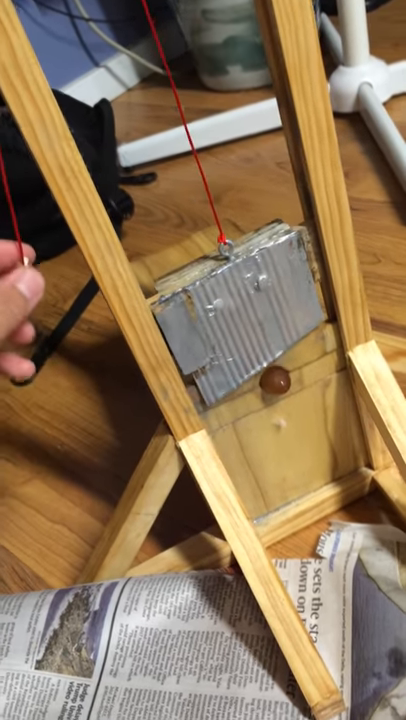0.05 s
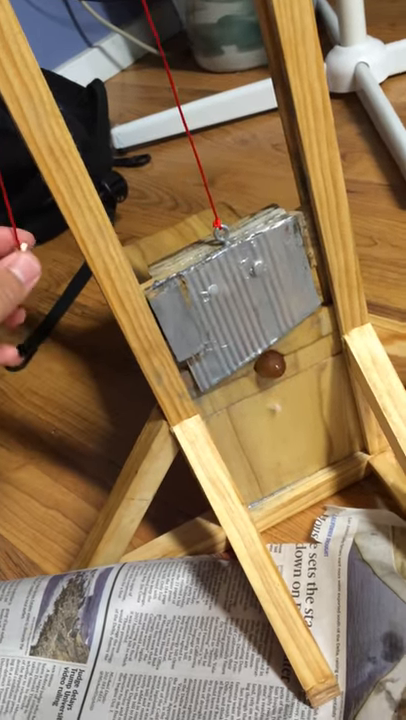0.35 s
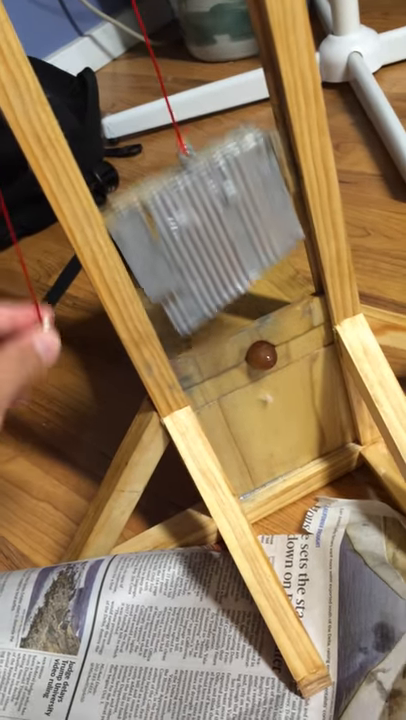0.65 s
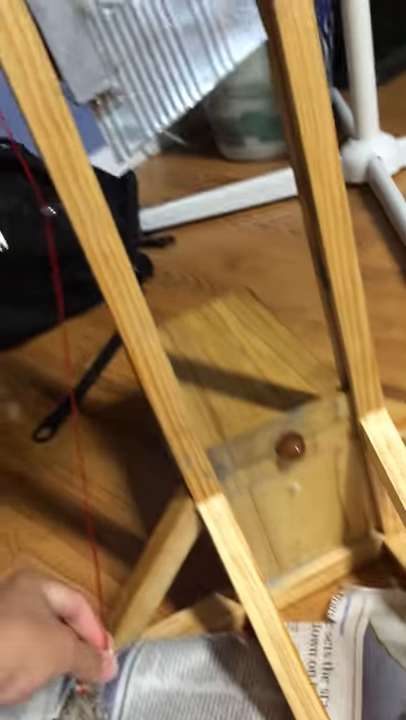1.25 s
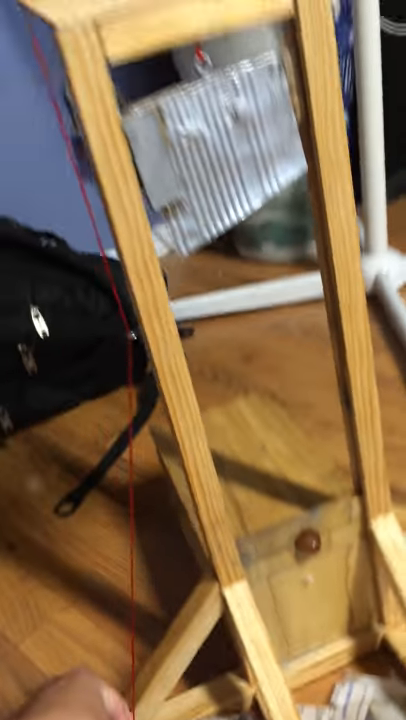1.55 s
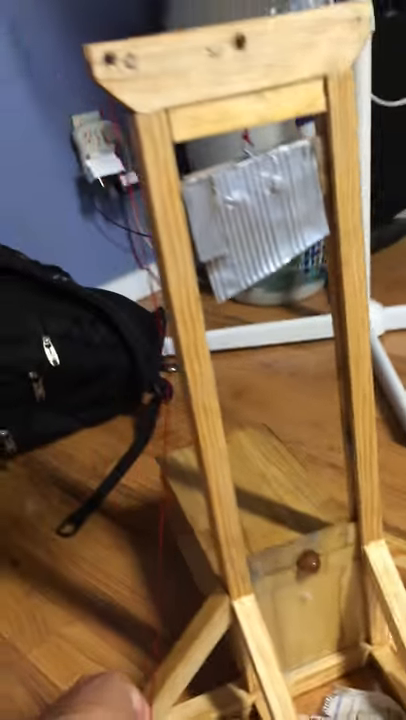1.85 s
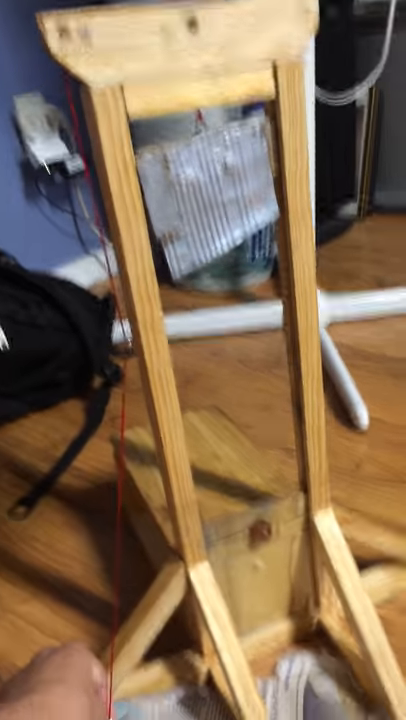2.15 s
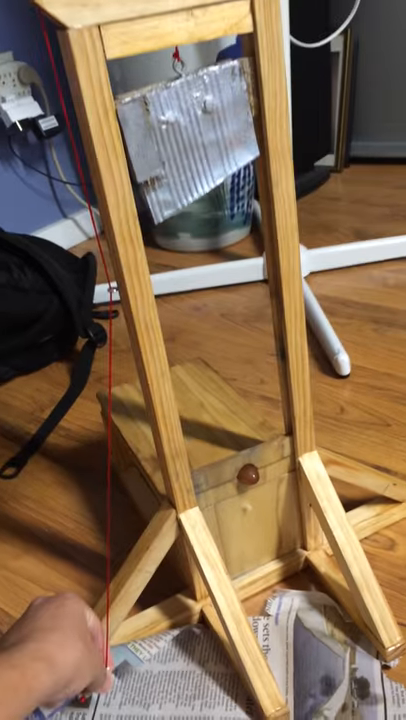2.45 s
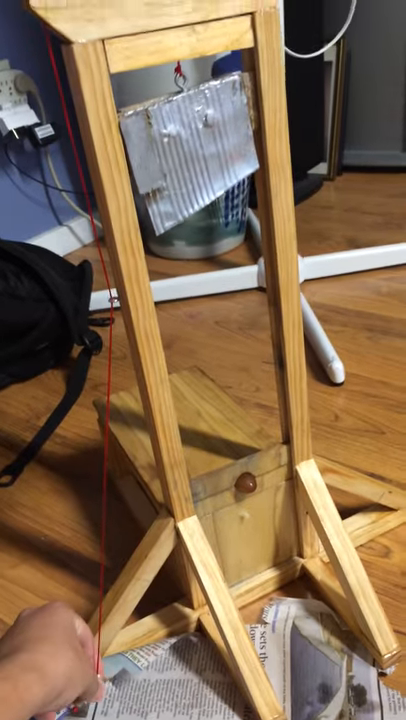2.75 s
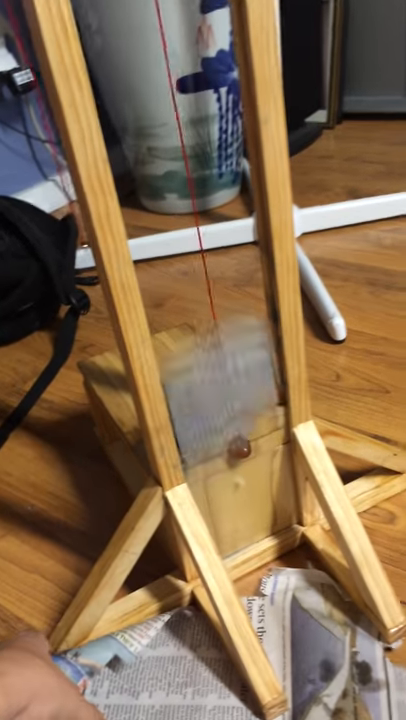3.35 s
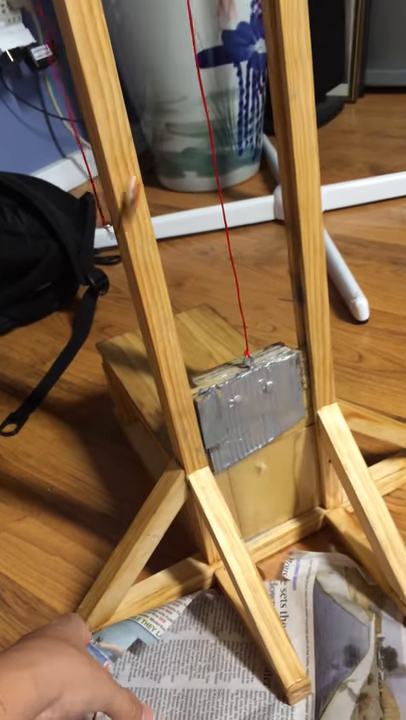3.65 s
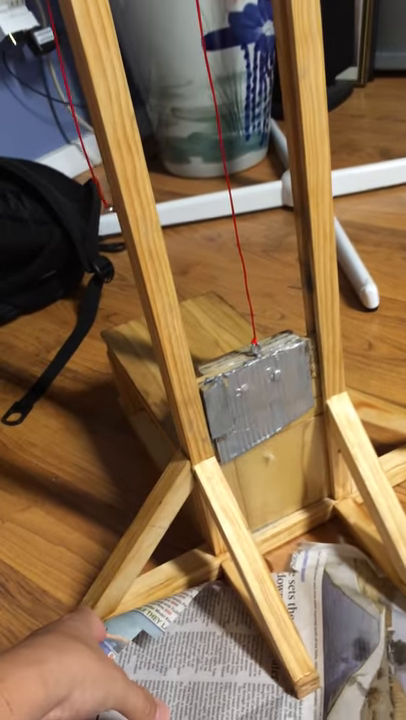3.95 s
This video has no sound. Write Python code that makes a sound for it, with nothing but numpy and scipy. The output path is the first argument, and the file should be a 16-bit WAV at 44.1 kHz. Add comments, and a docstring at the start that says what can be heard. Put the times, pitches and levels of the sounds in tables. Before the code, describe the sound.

A model guillotine's blade is hauled up, rasping, then slams onto its wooden base.

```python
"""Small wooden guillotine, close up

A quiet, small room, the microphone near the frame. A cord hauls the foil-clad blade up its grooves:
it judders free, chatters against the posts and ticks at the top. Let go, it scrapes down, slams
into the wooden base, bounces and settles with a few metallic clinks. Handling rumbles underneath."""
import sys
import numpy as np
from scipy import signal
from scipy.fft import rfft, irfft, next_fast_len
from scipy.io import wavfile
from scipy.ndimage import uniform_filter1d

SR = 44100
rng = np.random.default_rng(int(sys.argv[2]) if len(sys.argv) > 2 else 0)


def master_out(mix):
    """Clip the mix to full scale and print it as 16-bit PCM to the path in sys.argv[1]."""
    frames = np.transpose(np.atleast_2d(mix))
    ceiling = np.clip(frames, -1, 1)
    pcm = np.round(ceiling * 32767).astype(np.int16)
    wavfile.write(sys.argv[1], SR, pcm)


N = 176400
T = np.arange(N) / SR
RING_T = T[:SR * 3 // 4]  # time axis of one impact
CONTACT_RISE_S = .00047

# Spectrum of the blade on the posts, rubbing or bumping. Each row: frequency in Hz, level in dB.
POST_COLOUR = [(100, -12), (300, -2), (500, 0.5), (720, 0.5), (1000, -7), (1350, -5), (1900, -18.5),
               (3000, -31), (12000, -47)]


def undb(db):
    """Decibels to gain."""
    return 10 ** (np.asarray(db) / 20)


def unit(x):
    """Scale to rms 1."""
    return x / np.sqrt(np.mean(x ** 2) + 1e-30)


def curve(rows):
    """Gain along (seconds, dB) points, silent outside them."""
    s, db = np.array(rows).T
    return undb(np.interp(T, s, db, left=-200, right=-200))


def swell(start, length):
    """A half-sine rise and fall, timed in seconds."""
    return np.sin(np.pi * np.clip((T - start) / length, 0, 1))


def rise(s):
    """A contact builds up with a time constant of s seconds."""
    return 1 - np.exp(-RING_T / s)


def fade(t60):
    """Decay by 60 dB in t60 seconds."""
    return np.exp(-np.log(1000) * RING_T / t60)


def wander(hz):
    """Smooth random motion up to about hz, rms 1."""
    return unit(signal.sosfilt(signal.butter(2, hz, fs=SR, output="sos"), rng.standard_normal(N)))


def colour(x, points, tilt_db=0):
    """Filter through (Hz, dB) points, tilted per octave above 1 kHz; white noise keeps its power."""
    size = 2 * next_fast_len(len(x) // 2 + 2048)
    octave = np.log2(np.maximum(np.arange(size // 2 + 1) * SR / size, 10))
    hz, db = np.array(points).T
    gain = unit(undb(np.interp(octave, np.log2(hz), db) + tilt_db * np.maximum(octave, 10)))
    cepstrum = irfft(np.log(gain))
    cepstrum[1:size // 2] *= 2  # minimum phase: nothing sounds ahead of a hit
    cepstrum[size // 2 + 1:] = 0
    return irfft(rfft(x, size) * np.exp(rfft(cepstrum)))[:len(x)]


def ring(modes):
    """Decaying (Hz, dB, t60) modes of a struck object, alternating in sign."""
    return sum((-1) ** k * undb(db) * fade(t60) * np.sin(2 * np.pi * hz * RING_T)
               for k, (hz, db, t60) in enumerate(modes))


def through(x, response):
    """Pass a sound through a ringing body or room."""
    return signal.fftconvolve(x, response)[:N]


def add(out, start, x):
    """Mix a sound in at start seconds."""
    i = int(start * SR)
    out[i:i + len(x)] += x[:N - i]


def burst(t60):
    """A rough contact that dies away, even in spectrum."""
    envelope = fade(t60)[:int(SR * np.clip(1.3 * t60, .01, .75))]
    x = rng.choice([-1., 1.], len(envelope)) * envelope
    for _ in range(3):  # flatten the spectrum, then restore the decay
        x = irfft(np.exp(1j * np.angle(rfft(x))), len(x))
        local_power = np.abs(uniform_filter1d(x * x, len(x) // 24))
        x = x * envelope / np.sqrt(local_power + 1e-20)
    return np.pad(x, (0, len(RING_T) - len(x)))


def grains(per_s, spread_db):
    """Dense tiny catches of one surface on another."""
    catches = (rng.random(N) < per_s / SR) * rng.choice([-1., 1.], N)
    return unit(catches * undb(spread_db * np.minimum(rng.exponential(size=N), 4)))


def room_tone():
    """Still air: faint, steady noise, mostly bass."""
    # Each row: frequency in Hz, level in dB.
    spectrum = [(15, -58), (25, -32.5), (60, -9), (163, -3), (196, -20.5), (271, -14.5), (344, -24),
                (462, -27.5), (709, -19), (1030, -22), (1420, -25), (1810, -26.5), (15000, -46)]
    return undb(-65) * unit(colour(rng.standard_normal(N), spectrum))


def handling_rumble():
    """Handling makes a soft rumble that comes and goes."""
    # Each row: time in seconds, level in dB.
    levels = [(0, -55.5), (.1, -60.5), (.25, -67), (1.2, -66), (1.53, -53.5), (1.7, -57), (1.83, -61.5),
              (2.0, -61.5), (2.15, -63), (2.4, -64), (2.76, -65), (3.1, -64), (3.55, -60), (3.8, -66),
              (4, -60)]
    # Each row: frequency in Hz, level in dB.
    spectrum = [(25, -12.5), (75, -2.5), (170, 5), (300, -4), (600, -10), (2000, -20), (6000, -27.5),
                (15000, -42)]
    return colour(rng.standard_normal(N), spectrum) * curve(levels)


def brushes():
    """Cord and blade brush the frame in soft, gritty strokes."""
    # Each row: start in seconds, length in seconds, level in dB.
    strokes = [(0, .11, -86), (0.18, .1, -74), (1.685, 0.055, -52.5), (2.227, 0.049, -69.5),
               (2.34, .05, -71.5), (3.827, 0.059, -60), (3.903, 0.087, -63.5)]
    # Each row: frequency in Hz, level in dB.
    spectrum = [(300, -16), (1200, -10), (2000, 3), (2800, -3.5), (4000, -10.5), (7000, -11.5),
                (15000, -31)]
    level = sum(undb(db) * swell(start, length) for start, length, db in strokes)
    return colour(grains(per_s=4000, spread_db=0), spectrum) * level


def judder():
    """The blade breaks free: uneven stick-slip pulses shake the frame, and each slip rasps on the wood."""
    # Course of the shake and the rasp. Each row: time in seconds, level in dB.
    shake_levels = [(.305, -69), (.325, -49), (.385, -52), (.405, -45.5), (.46, -46), (.55, -43.5),
                    (.61, -54.5), (.72, -56), (.8, -55), (.92, -52), (1.1, -62), (1.4, -65)]
    rasp_levels = [(.31, -73), (.335, -58), (.385, -58), (.41, -47), (.455, -47.5), (.478, -53.5),
                   (.525, -44.5), (.56, -47), (.6, -55), (.72, -71), (.8, -82.5)]
    # Their spectra. Each row: frequency in Hz, level in dB.
    shake_colour = [(30, -16), (70, 6.5), (120, -2.5), (200, 2.5), (290, -1), (400, -8.5), (700, -16),
                    (1500, -30), (8000, -80)]
    rasp_colour = [(200, -28), (500, -2), (1100, -3.5), (1600, 0.5), (2500, -2), (3300, -8), (4500, -15),
                   (15000, -39)]
    # Resonances of the rasped wood. Each row: frequency in Hz, level in dB, t60 in seconds.
    wood_modes = [(980, 3.5, 0.066), (1138, -1, .12), (1623, 2.5, 0.05), (1982.9, -5, 0.091)]
    slip_hz, scatter = 84.03, .22
    gaps = np.exp(scatter * rng.standard_normal(400)) / slip_hz
    phase = np.interp(T, np.cumsum(gaps), np.arange(len(gaps))) % 1
    slips = unit(1. * (np.diff(phase, prepend=0) < -.5))  # one pulse as each cycle ends
    shake = unit(colour(slips - slips.mean() + .55 * rng.standard_normal(N), shake_colour))
    grit = grains(per_s=5000, spread_db=1) * np.exp(-phase / 2.1)
    ringing = unit(through(grit, ring(wood_modes)))
    rasp = unit(unit(colour(grit, rasp_colour)) + undb(-4) * ringing)
    return shake * curve(shake_levels) + rasp * curve(rasp_levels)


def cord_hiss():
    """The running cord hisses with fine friction, its level flickering."""
    # Each row: time in seconds, level in dB.
    levels = [(.305, -87), (.33, -63.5), (.52, -62), (.63, -65.5), (.74, -56.5), (.95, -57.5), (1.2, -61),
              (1.32, -56.5), (1.45, -70.5), (1.48, -67), (1.51, -56.5), (1.55, -58.5), (1.65, -62),
              (1.68, -71), (1.715, -68), (1.78, -72), (1.83, -72), (1.91, -56), (2.0, -67.5), (2.07, -63.5),
              (2.15, -78), (2.45, -80.5), (2.55, -67), (2.72, -83), (3.2, -92)]
    # Each row: frequency in Hz, level in dB.
    spectrum = [(500, -12), (1300, -3), (2100, 1), (2900, -2.5), (4100, -2.5), (5200, -2), (6400, -2.5),
                (7500, -3), (8700, -6), (11000, -9.5), (15000, -18)]
    hiss = colour(grains(per_s=9000, spread_db=4), spectrum)
    return hiss * curve(levels) * undb(1.6 * wander(hz=16))


def groan():
    """The wood groans as the blade starts to move: a rough, sinking stick-slip tone."""
    # Each row: time in seconds, pitch in Hz, level in dB.
    glide = [(.385, 333, -52), (0.404, 324.7, -50), (.44, 313, -59), (0.46, 283.6, -39.5),
             (0.482, 285.3, -42.5), (.51, 245.7, -48), (.55, 233.3, -46.5), (.59, 222, -61),
             (0.621, 220, -63)]
    s, hz, db = np.array(glide).T
    pitch = np.interp(T, s, hz) * (1 + .0722 * wander(hz=89))
    tone = np.sin(2 * np.pi * np.cumsum(pitch) / SR)
    return unit(tone * (1 + .27 * wander(hz=60))) * curve(np.c_[s, db])


def squeaks():
    """Brief, wavering friction tones as the blade sticks."""
    # Each row: start in seconds, length in seconds, pitch in Hz, level in dB.
    sticks = [(0.396, 0.098, 1160, -51.5), (.5, 0.043, 990, -43.5), (.53, 0.059, 1160, -48.5),
              (0.498, 0.056, 2010, -50.5)]
    out, waver = np.zeros(N), 1 + .0271 * wander(hz=150)
    for start, length, hz, db in sticks:
        tone = np.sqrt(2) * np.sin(2 * np.pi * hz * np.cumsum(waver) / SR)
        out += undb(db) * swell(start, length) * tone
    return out


def hand_thumps():
    """The hand thumps softly, sounding one low, damped mode."""
    # Each row: start in seconds, level in dB.
    thumps = [(.455, -32), (0.777, -37), (.865, -39.5), (0.911, -35), (1.475, -54), (1.766, -43.5),
              (1.816, -43), (1.83, -43.5), (2.754, -44), (3.465, -38), (3.534, -35)]
    out, thump = np.zeros(N), ring([(83, 0, .06)]) * rise(.0056)
    for start, db in thumps:
        add(out, start, undb(db) * thump)
    return out


def cord_whistle():
    """The cord whistles over its guide: two narrow, patchy bands that sink as the pull slows."""
    # Each row: time in seconds, centre of the upper band in Hz, its level in dB.
    glide = [(.47, 5230, -67), (.53, 5260, -67), (0.601, 5593, -71), (0.679, 5550, -65), (.8, 5385, -63),
             (.97, 5220, -61), (1.1, 5030, -61), (1.251, 4980, -69.5), (1.4, 4960, -82)]
    width_hz, spacing_hz, flicker_db = 650, 1123, 2
    s, hz, db = np.array(glide).T
    centre = np.interp(T, s, hz)

    def band(band_hz):
        carrier = np.sin(2 * np.pi * np.cumsum(band_hz + 120 * wander(hz=197)) / SR)
        return unit(wander(width_hz / 2) * carrier * undb(flicker_db * wander(hz=25)))
    return (band(centre) + undb(-4.5) * band(centre - spacing_hz)) * curve(np.c_[s, db])


def post_bumps():
    """The blade bumps the posts; each hollow knock has its own broad resonance."""
    # Each row: start in seconds, peak in dB, resonance in Hz.
    bumps = [(.486, -33.5, 530), (.611, -39.5, 824), (.629, -38, 520), (.678, -37.5, 421),
             (.868, -38, 1150), (.888, -38, 1160), (.962, -33.5, 784), (1.045, -29, 800), (1.057, -37, 620),
             (1.08, -32.5, 892.5), (1.116, -30, 810), (1.13, -42, 825), (1.167, -29.5, 740),
             (1.234, -34, 760), (1.247, -38, 1280), (3.314, -35, 1250), (3.322, -37, 1253),
             (3.358, -36, 420), (3.389, -33.5, 584), (3.514, -21, 200), (3.581, -22, 386)]
    out = np.zeros(N)
    for start, db, hz in bumps:
        contact = colour(burst(t60=.034)[:SR // 8], POST_COLOUR)
        resonance = signal.lfilter(*signal.iirpeak(hz, Q=1 / .35, fs=SR), contact)
        knock = .26 * contact + resonance
        add(out, start, undb(db) * knock / np.abs(knock).max())
    return out


def groove_rub():
    """The rising blade rubs in its wooden grooves with a coarse grain."""
    # Each row: time in seconds, level in dB.
    levels = [(.5, -89), (.615, -49.5), (.7, -58), (.76, -53.5), (.84, -53), (.885, -47), (.93, -51),
              (1.02, -47), (1.125, -42), (1.2, -51), (1.25, -50), (1.33, -55.5), (1.47, -68), (1.6, -66),
              (1.8, -102)]
    return colour(grains(per_s=900, spread_db=2), POST_COLOUR) * curve(levels)


def ticks():
    """Dry little contacts of the blade and its hook, each with its own brightness."""
    # Each row: start in seconds, relative level in dB, tilt in dB per octave, t60 in seconds.
    contacts = [(1.385, -40.5, -1.5, 0.023), (1.448, -47.5, -10, 0.027), (1.511, -42, -18, 0.014),
                (1.5563, -32, -4, 0.033), (1.5898, -29, 3, 0.013), (1.894, -26, 1, 0.015),
                (1.8981, -35, 1, 0.013), (1.911, -46, 1, .01), (1.9162, -31, 5, 0.013),
                (2.0642, -36.5, -2, 0.029), (2.074, -40.5, -2.5, .06), (2.5694, -40.5, -7, 0.02),
                (3.269, -54, -2, 0.015), (3.31, -42, -4, 0.02), (3.3548, -30, 3, .025),
                (3.428, -27.5, -1.5, 0.024), (3.439, -20, 21, 0.0086), (3.468, -12.5, 10, 0.0082),
                (3.7519, -32, -2, 0.024)]
    # Each row: frequency in Hz, level in dB.
    spectrum = [(200, -11), (900, -10), (1500, 0.5), (2000, 4.5), (2700, 2.5), (3600, 1), (5000, -6),
                (6300, -2.5), (7500, 0.5), (8700, -8.5), (10500, -10.5), (15000, -27.5)]
    out = np.zeros(N)
    for start, db, tilt, t60 in contacts:
        contact = (burst(t60) * rise(CONTACT_RISE_S))[:SR // 10]
        add(out, start, undb(db - 3.5) * colour(contact, spectrum, tilt))
    return out


def falling_scrape():
    """Let go, the blade scrapes down its grooves in growing surges."""
    # Each row: time in seconds, level in dB.
    levels = [(3.25, -75.5), (3.272, -52.5), (3.298, -65), (3.316, -46.5), (3.34, -51), (3.36, -42),
              (3.38, -49), (3.395, -39), (3.41, -42.5), (3.44, -40.5), (3.48, -38), (3.5, -86.5)]
    # Each row: frequency in Hz, level in dB.
    spectrum = [(60, -23), (200, -9), (500, -1.5), (1300, -4), (2200, -7), (4000, -10.5), (7000, -12),
                (11000, -20), (15000, -36)]
    return colour(grains(per_s=1600, spread_db=.5), spectrum) * curve(levels)


def clinks():
    """The loose blade clinks: a click, a short ping and lasting modes, ringing most as it comes to rest."""
    # Each row: start in seconds, relative level in dB, click t60 in seconds, gain of the ring in dB.
    contacts = [(3.4193, -13, 0.021, -40), (3.512, -12, 0.028, -32), (3.576, -20.5, 0.052, -37),
                (3.6271, -10.5, 0.024, -44.5), (3.711, -28, 0.019, -32), (3.719, -22.5, 0.019, -17.5)]
    # Spectrum of the click. Each row: frequency in Hz, level in dB.
    click_colour = [(300, -13), (1500, -9), (2800, -6), (3900, -2), (5100, 0.5), (7000, -2.5),
                    (9000, -15.5), (15000, -41.5)]
    # Each row: frequency in Hz, level in dB, t60 in seconds.
    blade_modes = [(3810, -17, .2), (4770, -10.5, .22), (4884, -5, 0.2), (4916, -4.5, .28), (4876, -7, .25),
                   (5144, -8.5, .2)]
    ping = ring([(4895, 24.5, .022)])
    out, sheet = np.zeros(N), ring(blade_modes) + ping
    for start, db, t60, ring_db in contacts:
        clink = colour(burst(t60), click_colour) + undb(ring_db) * sheet
        add(out, start, undb(db - 7.5) * clink * rise(CONTACT_RISE_S))
    return out


def landing():
    """The blade cracks on the base and bounces, duller; the frame rings with strong modes over dense ones."""
    # Each row: start in seconds, relative level in dB, tilt in dB per octave.
    blows = [(3.4705, -32, -2.5), (3.4819, -2, -0.5), (3.5115, -10.5, -1.5), (3.526, -15, -2.5),
             (3.537, -18, -2.5), (3.5806, -21.5, -3), (3.612, -37, -8)]
    # Spectra of the crack and of the dense modes. Each row: frequency in Hz, level in dB.
    crack_colour = [(60, -29.5), (300, -10.5), (700, -2), (1100, 1.5), (1500, -1), (2200, -10),
                    (3200, -18.5), (4100, -5.5), (5200, -14), (6800, -6.5), (9000, -15.5), (15000, -30)]
    body_colour = [(40, -28.5), (110, -16), (180, -7), (260, -8.5), (400, -3), (750, 0.5), (1000, -5),
                   (1450, -4), (2100, -4), (3200, -6.5), (4800, -7), (7000, -8.5), (10000, -15),
                   (15000, -31)]
    # The frame's strong modes. Each row: frequency in Hz, level in dB, t60 in seconds.
    frame_modes = [(184, -9, .3), (222, -13, .2), (329, -11, .27), (421, -10, .3), (696, -8, .2),
                   (735, -9, .2), (792, 0, .23), (1110, -7, .17), (1151, -4, .17), (1231, -7, .17),
                   (1302, -7, .17), (1392, -2, .17), (1443, -1, .17), (1480, -3, .17), (1642, -6, .17),
                   (2815, -10, .22)]
    attack = rise(.002)
    out, frame = np.zeros(N), ring(frame_modes) * attack
    for start, db, tilt in blows:
        crack = colour(burst(t60=.014) * attack, crack_colour, tilt)
        crack /= np.sqrt(np.mean(crack[:SR // 250] ** 2))  # rms 1 over the first 4 ms
        body = colour(burst(t60=.23), body_colour, tilt) * rise(.006)
        add(out, start, undb(db) * (undb(-8) * crack + undb(-15) * body + undb(-21.5) * frame))
    return out


def room_echo(direct):
    """Near walls return a short, diffuse tail."""
    # Each row: frequency in Hz, level in dB.
    spectrum = [(100, 1.5), (500, 2.5), (1400, 2.5), (2500, 3.5), (6000, -2.5), (10000, -5), (15000, -7.5)]
    delay_s = .003
    tail = colour(burst(t60=.45) * (RING_T > delay_s), spectrum)
    return through(direct, tail / np.sqrt(np.sum(tail ** 2)))


def scene():
    """One microphone close to the guillotine, with the room's echo, still air and handling behind."""
    friction = brushes() + judder() + groan() + squeaks() + groove_rub() + falling_scrape()
    cord = cord_hiss() + cord_whistle()
    impacts = hand_thumps() + post_bumps() + ticks() + clinks() + landing()
    direct = friction + cord + impacts
    return (direct + undb(-15) * room_echo(direct) + room_tone() + handling_rumble())[None]


def record(dry):
    """The recorder rounds the loudest peak and cuts the top of the treble."""
    ceiling, top_hz = .95, 15400
    lowpass = signal.ellip(10, .2, 80, top_hz, fs=SR, output="sos")
    return signal.sosfilt(lowpass, ceiling * np.tanh(dry / ceiling))


dry = scene()
out = record(dry)
master_out(out)
```